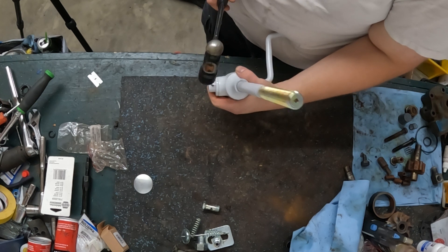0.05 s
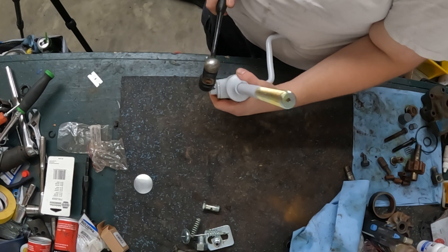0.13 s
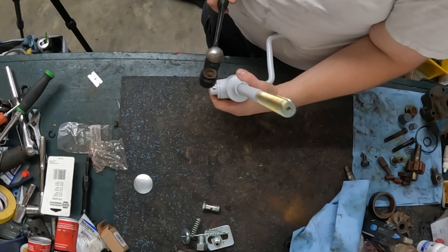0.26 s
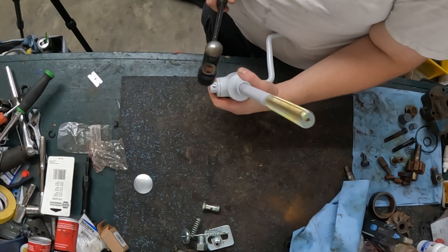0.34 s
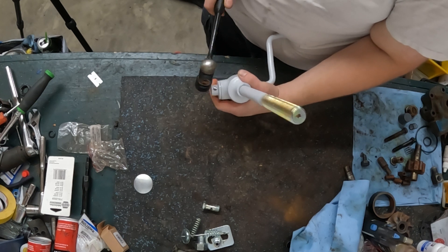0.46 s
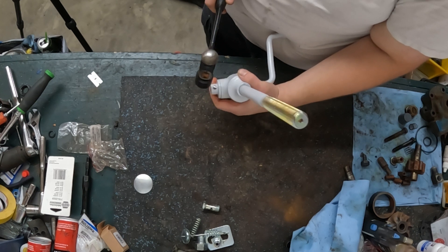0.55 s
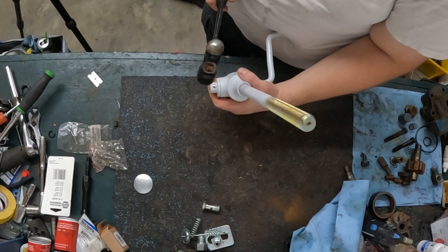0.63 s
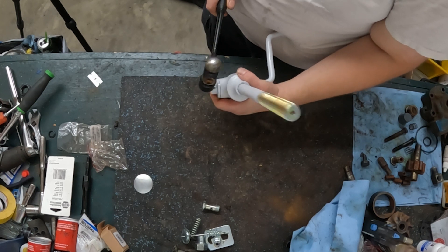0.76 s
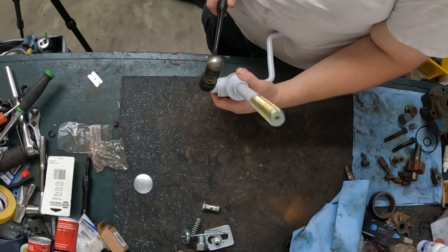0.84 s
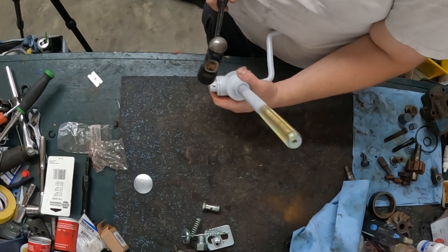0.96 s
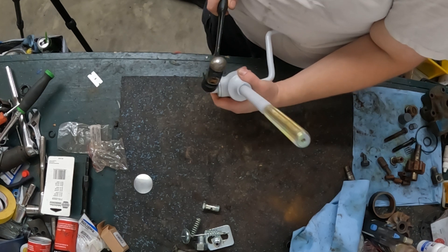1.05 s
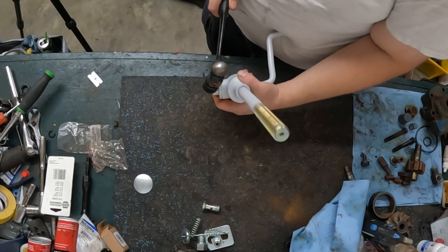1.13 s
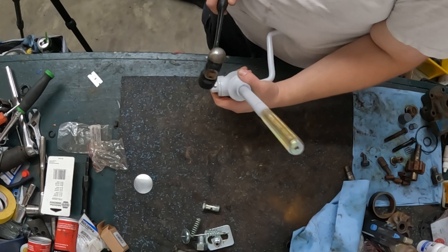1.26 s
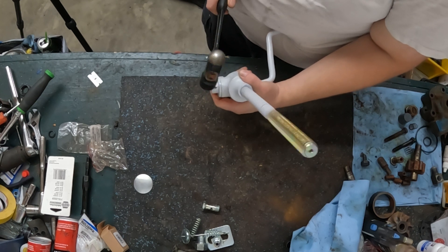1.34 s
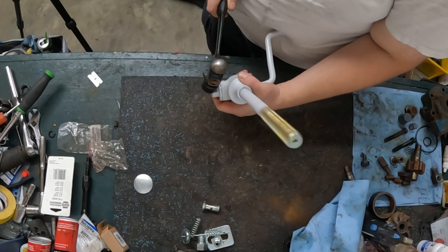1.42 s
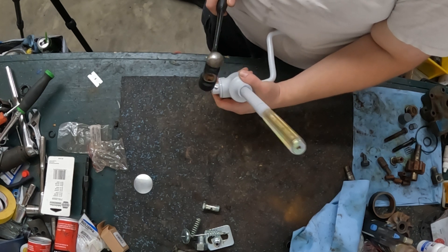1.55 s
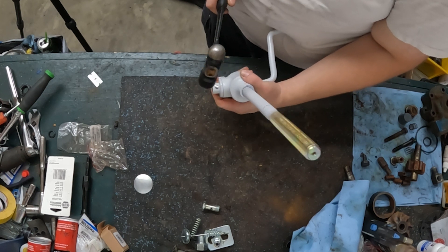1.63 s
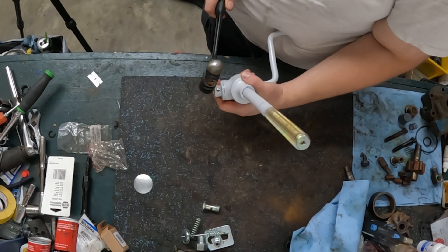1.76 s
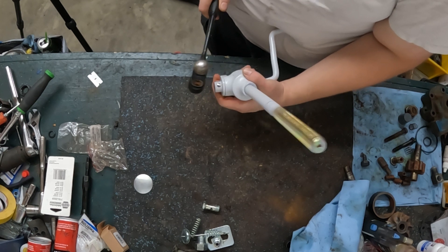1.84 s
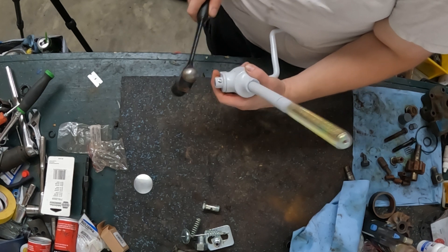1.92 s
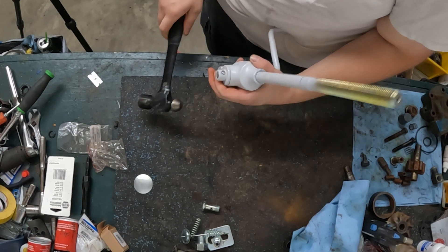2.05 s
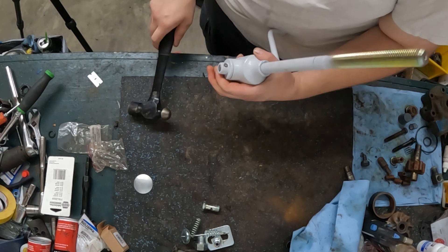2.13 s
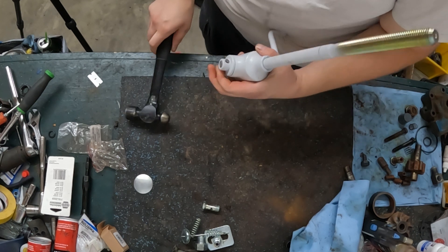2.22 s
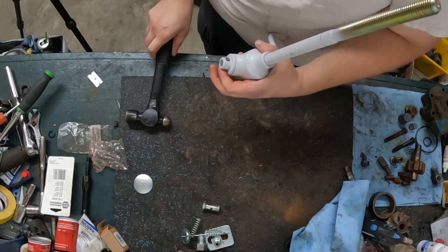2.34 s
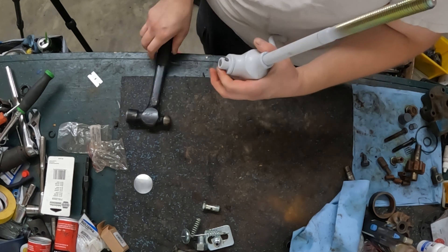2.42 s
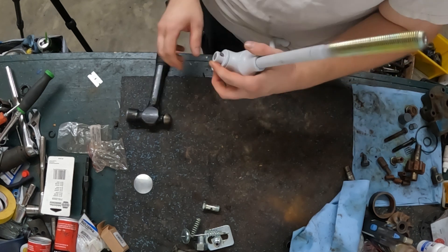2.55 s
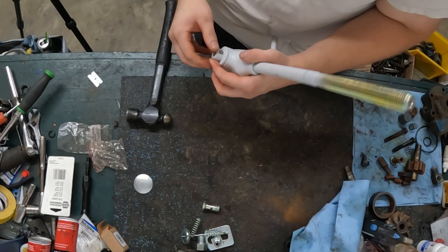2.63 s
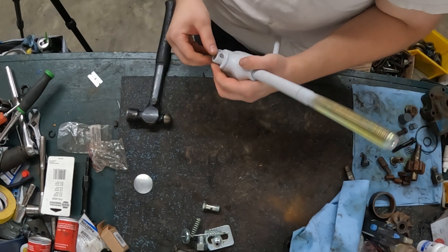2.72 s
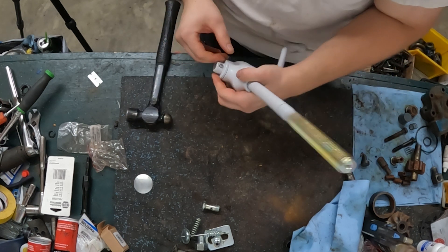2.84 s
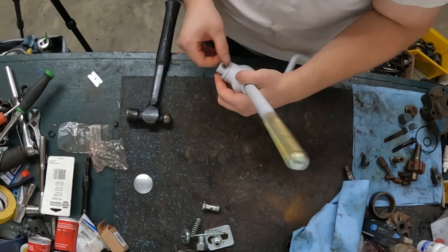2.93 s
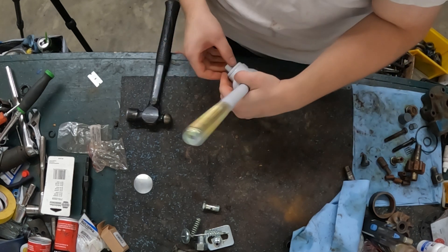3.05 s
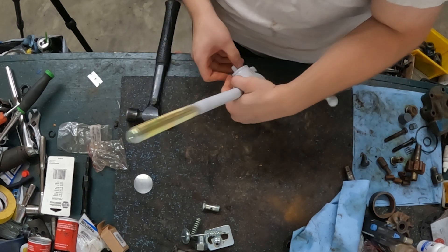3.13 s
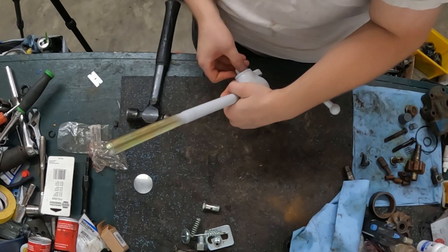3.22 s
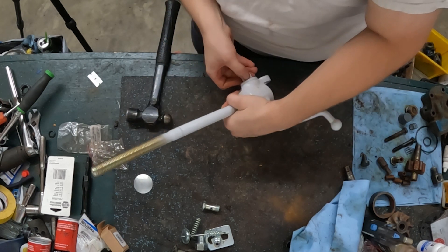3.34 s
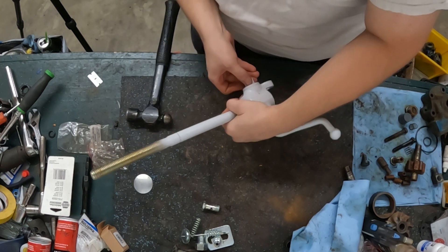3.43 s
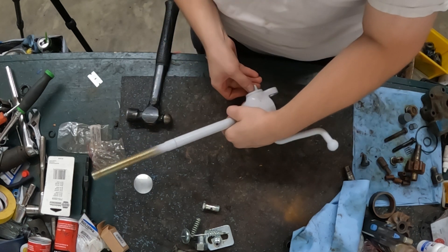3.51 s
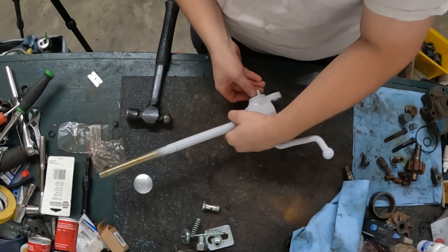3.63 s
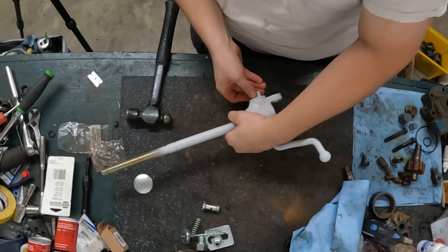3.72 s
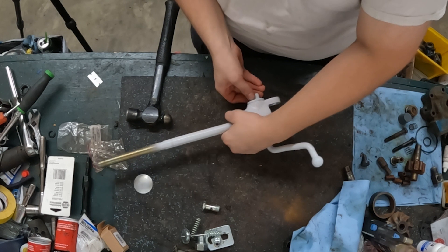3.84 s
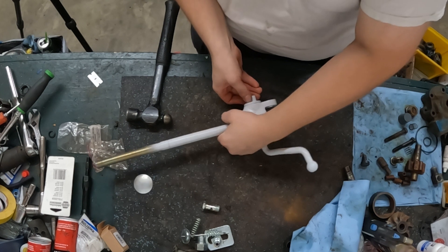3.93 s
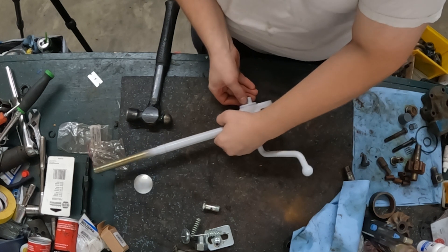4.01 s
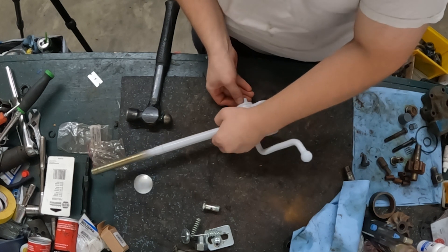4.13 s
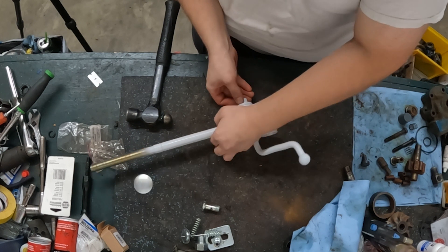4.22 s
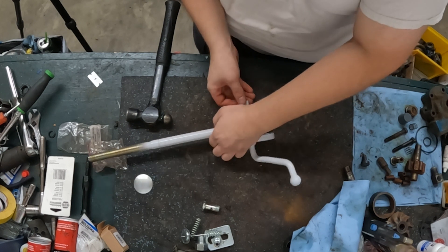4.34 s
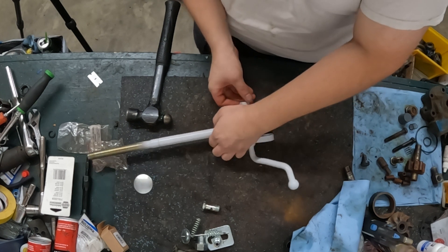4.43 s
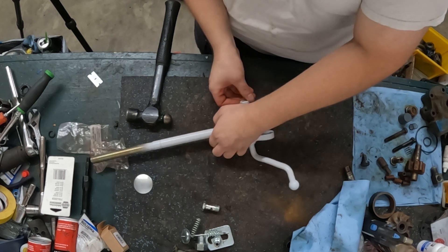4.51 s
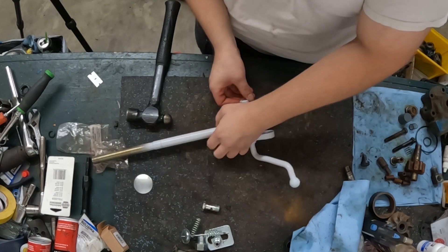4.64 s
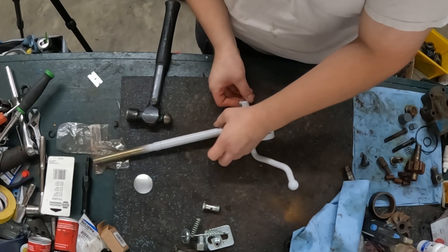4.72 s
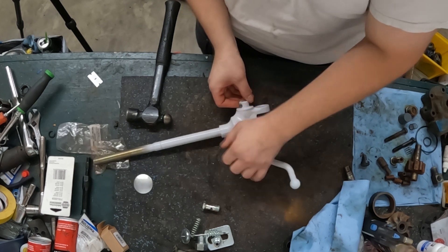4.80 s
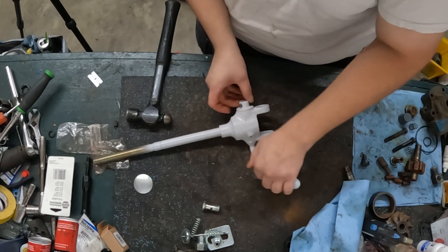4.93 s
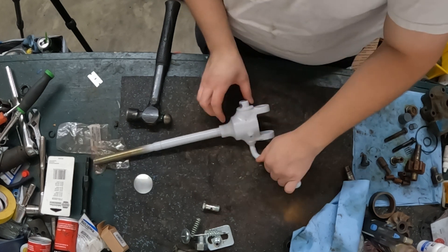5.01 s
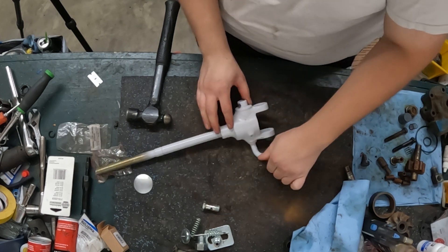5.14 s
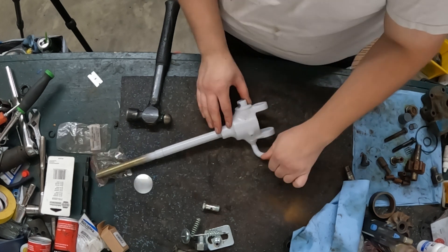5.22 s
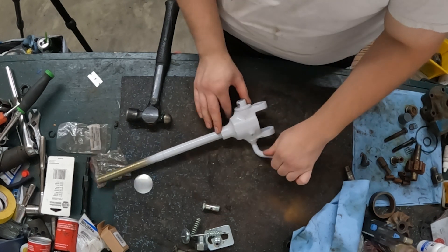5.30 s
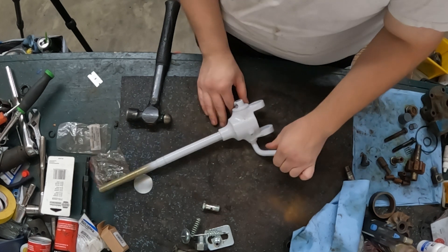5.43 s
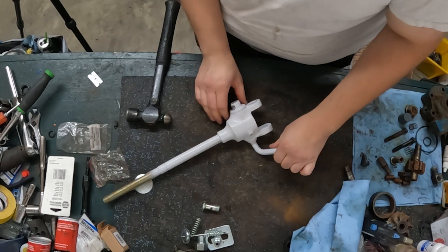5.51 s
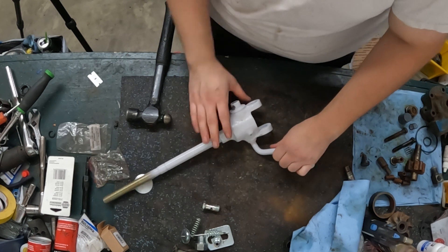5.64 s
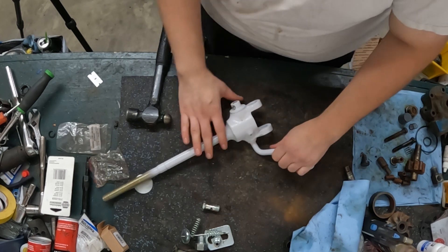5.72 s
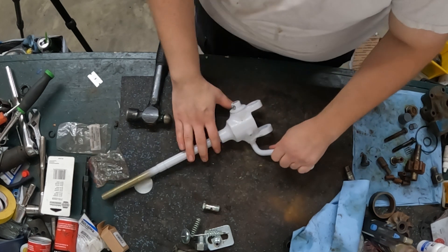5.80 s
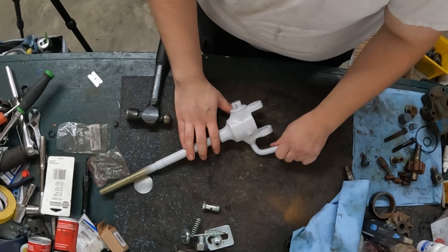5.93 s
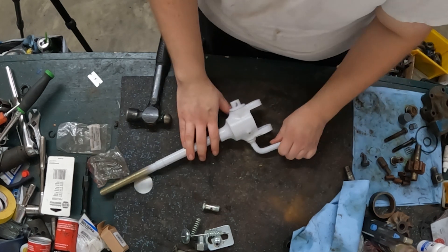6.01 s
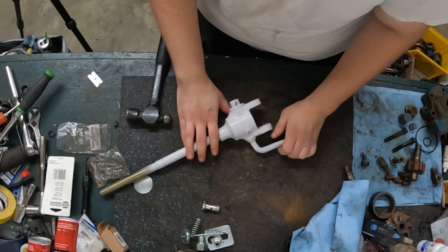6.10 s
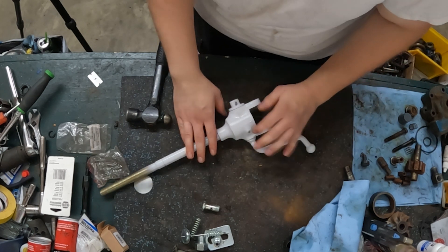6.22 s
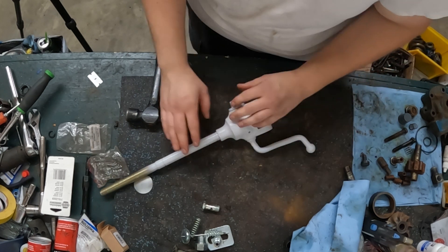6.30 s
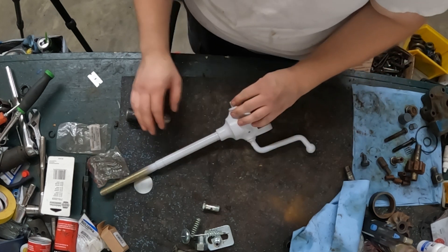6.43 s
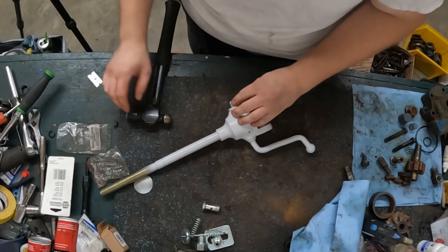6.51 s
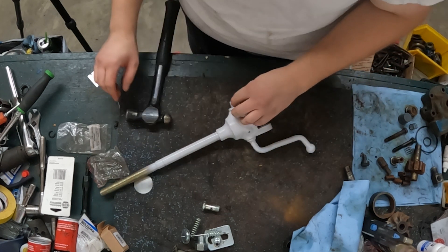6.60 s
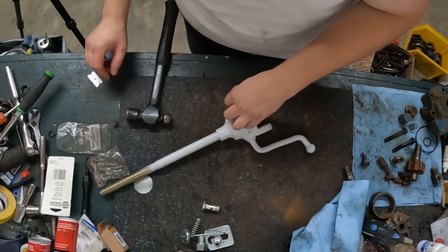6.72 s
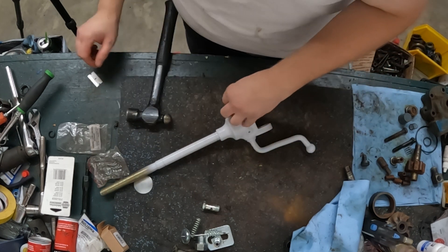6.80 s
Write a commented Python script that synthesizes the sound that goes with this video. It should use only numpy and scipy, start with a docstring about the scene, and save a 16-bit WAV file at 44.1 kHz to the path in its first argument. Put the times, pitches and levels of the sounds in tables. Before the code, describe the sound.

A hammer taps a pin into a steel shaft six times, then metal thuds, clicks and slides on a workbench.

```python
"""Six ringing hammer taps drive a pin into a hand-held steel shaft; the hammer is then laid on the bench.
The shaft is turned over, set down with thuds, slid, clicked and squeaked across the bench mat.
Hits are noise cracks and decaying steel or bench modes; slides are friction noise, squeaks stick-slip.
A hard surface returns each crack a few ms later; mains hum and a low rumble fill the workshop."""
import sys
import numpy as np
from scipy import signal
from scipy.fft import rfft, irfft
from scipy.io import wavfile
from scipy.ndimage import uniform_filter1d

SR = 44100
rng = np.random.default_rng(int(sys.argv[2]) if len(sys.argv) > 2 else 0)


def generate_wav(signal):
    """Clip the signal to [-1, 1] and save it as 16-bit WAV at the path in sys.argv[1]."""
    frames = np.transpose(np.atleast_2d(signal))
    scaled = np.clip(frames, -1, 1) * 32767
    pcm = np.round(scaled).astype(np.int16)
    wavfile.write(sys.argv[1], SR, pcm)


N = 302526
LEAD_S = .2  # tracks start this long before zero
BIN_HZ = np.fft.rfftfreq(2048, 1 / SR)


def gain_of(db):
    return 10 ** (np.asarray(db) / 20)


def unit_rms(x):
    return x / np.sqrt(np.mean(x ** 2) + 1e-20)


def curve_at(points, hz):
    point_hz, value = np.transpose(points)
    return np.interp(np.log(hz + 1), np.log(point_hz + 1), value)


def bell_db(hz, centre_hz, octave_drop_db):
    return -octave_drop_db * np.log2((hz + 1) / centre_hz) ** 2


def track(*channels):
    return np.zeros(channels + (N + round(LEAD_S * SR),))


def add(mix, s, sound):
    part = mix[..., round((s + LEAD_S) * SR):][..., :sound.shape[-1]]
    part += sound[..., :part.shape[-1]]


def narrow_band(noise, hz, width_hz):
    """Two resonators in series; unit rms."""
    r = np.exp(-np.pi * width_hz / SR)
    b, a = [1 - r, 0, r - 1], [1, -2 * r * np.cos(2 * np.pi * hz / SR), r * r]
    return unit_rms(signal.lfilter(b, a, signal.lfilter(b, a, noise)))


def hammer():
    """Each blow cracks and rings the hand-damped steel, detuned by the grip; the head pings."""
    # (time [s], level [dB], head ping [dB]); the first falls before zero
    blows = [(-.1, -13, -36), (0.2107, -12.5, -28), (0.5077, -13, -29), (0.8307, -11, -26),
             (1.164, -10.5, -28.5), (1.4857, -11, -27.5), (1.802, -11.5, -25)]
    # shaft and pin modes: (frequency [Hz], level [dB], t60 before hand damping [s])
    steel_modes = [(590, -3, .12), (1440, -4, .1), (2355, -8, .15), (3320, -8, .07), (3460, -9, .07),
                   (3635, -4, .13), (3850, -3, .06), (4550, -9, .08), (5120, -6, .11), (6220, -7, .07),
                   (11290, -7, .1), (12880, -12, .1)]
    # hammer head modes: (frequency [Hz], level [dB], t60 [s])
    head_modes = [(7400, 0, .13), (9995, 0, .14)]
    # crack spectrum: (frequency [Hz], density [dB])
    crack_colour = [(180, -37), (380, -29), (620, -24), (1450, -10.5), (2100, -14.5), (2890, -16.5),
                    (3770, -9), (4170, -9), (5020, -8), (7630, -7.5), (8730, -10.5), (11200, -9),
                    (15200, -21.5), (16500, -24.5)]
    echo_db, ring_db, clang_db, clang_width_hz, hand_damping = 10, -32, 8, 150, 1.6
    t = np.arange(round(.3 * SR)) / SR
    head = sum(gain_of(db - 60 * t / t60_s) * np.sin(2 * np.pi * hz * t) for hz, db, t60_s in head_modes)
    steel_hz, steel_db, t60_s = np.transpose(steel_modes)[:, :, None]
    colour = gain_of(curve_at(crack_colour, BIN_HZ) + bell_db(BIN_HZ, 3900, .09))
    ring_envelope = gain_of(ring_db + bell_db(steel_hz, 3900, .09) - 60 * hand_damping * t / t60_s)
    hits, ringing = [], track()
    for s, db, head_db in blows:
        mode_gain = gain_of(steel_db + rng.normal(0, 2.5, steel_db.shape))
        mode_hz = steel_hz * rng.normal(1, .008, steel_hz.shape)
        clang = (mode_gain / (1 + 2j * (BIN_HZ - mode_hz) / clang_width_hz)).sum(0)
        hits.append((s, db, echo_db, colour * (1 + gain_of(clang_db) * clang)))
        ring = (mode_gain * ring_envelope * np.sin(2 * np.pi * mode_hz * t)).sum(0)
        add(ringing, s, gain_of(db) * ring + gain_of(head_db) * head)
    direct, echo = cracks(hits, decay_ms=5.4, echo_rise_ms=2.26)
    return direct + ringing, echo


def cracks(hits, decay_ms, echo_rise_ms):
    """Contact noise bursts and their smeared, duller reflection: (mono direct, stereo echo)."""
    pad_s, echo_delay_s, echo_cutoff_hz = 128 / SR, .005, 7430
    ms = np.maximum(np.arange(2048) / SR - pad_s, 0) * 1000
    decay = np.exp(-ms / decay_ms) * (ms > 0)
    swell = ms * np.exp(-ms / echo_rise_ms)
    spread = .55 + BIN_HZ / 16000  # left and right differ more in the treble
    echo_filter = 1 / np.sqrt(1 + spread ** 2 / 2) / (1 + 1j * BIN_HZ / echo_cutoff_hz) ** 2
    direct, echo = track(), track(2)
    for s, db, echo_db, colour in hits:
        spectra = rfft(rng.standard_normal((4, 2048)) * [decay, swell, swell, swell])
        spectra /= np.sqrt(uniform_filter1d(abs(spectra) ** 2, size=30, axis=1))  # whiten
        spectra *= colour / np.sqrt(np.mean(abs(colour) ** 2)) * np.linalg.norm(decay) / 2
        burst, common, sides = spectra[0], spectra[1], spectra[2:]
        reflection = irfft((common + spread * sides) * echo_filter)
        add(direct, s - pad_s, gain_of(db) * irfft(burst))
        add(echo, s - pad_s + echo_delay_s, gain_of(db + echo_db) * reflection)
    return direct, echo


def bench_thuds():
    """Landings shake the bench top: its modes swell, low ones slowest, peak together and die."""
    # landings: (time [s], peak [dB], place [0 middle, 1 edge], hardness as tilt [dB/octave])
    landings = [(2.263, -28, 0.49, 1), (2.364, -16, 0.16, -3), (2.399, -7.5, 0.18, 2.5),
                (2.555, -3, 0.81, 9.5), (2.577, -7.5, 0.5, 8), (2.657, -6, 1, 9), (2.722, -13, 0.55, 3.5),
                (4.63, -12, 0.17, -1), (4.818, -5, 0.16, 1), (4.862, -18.5, 0.16, 6),
                (5.544, -27, 0.31, 12.5), (5.653, -3.5, 0.2, 10), (5.963, -28.5, 0.0049, -7),
                (6.036, -28, 0.2, 4), (6.232, -24, 0.36, 6)]
    # plate modes: (frequency [Hz], struck mid [dB], struck at edge [dB], t60 [s])
    plate_modes = [(43.2, -3.5, -15, 0.56), (58, 4.5, 19, 0.26), (96.8, -3.5, 4.5, 0.23),
                   (118.8, 21.5, -24.5, 0.21), (152, -6, -1.5, 0.28), (194.5, 11, -45, 0.14),
                   (215.8, -18, 8, 0.13), (309, -15, -5.5, 0.08), (412, -7, 8.5, 0.0082)]
    # contact to common peak: (middle [s], edge [s])
    peak_delays_s = (0.01286, 0.0157)
    out, t = track(), np.arange(round(.5 * SR)) / SR
    hz, middle_db, edge_db, t60_s = np.transpose(plate_modes)[:, :, None]
    rise_s = .0063 * np.sqrt(100 / hz)
    swell = 1 - np.exp(-(t / rise_s) ** 2)
    for s, db, place, tilt_db in landings:
        mode_db = (1 - place) * middle_db + place * edge_db + tilt_db * np.log2(hz / 120)
        peak_s = np.interp(place, [0, 1], peak_delays_s)
        thud = (gain_of(mode_db - 60 * t / t60_s) * swell * np.cos(2 * np.pi * hz * (t - peak_s))).sum(0)
        add(out, s, gain_of(db) * thud / abs(thud).max())
    return out


def metal_clicks():
    """Metal parts touch: very short, bright cracks."""
    # contacts: (time [s], level [dB], echo re level [dB], centre [Hz])
    contacts = [(0.47, -38, 0, 3230), (4.294, -38.5, 6, 4470), (4.771, -20, 6.5, 3280),
                (4.794, -21.5, 6, 3170), (4.808, -20.5, 9, 3170), (4.82, -19, 2, 4000),
                (4.84, -19, 9, 5500), (4.864, -29, 7, 4500), (5.204, -21, 4, 2840), (5.311, -27.5, 1, 2590),
                (5.332, -25.5, 3, 2600), (5.387, -17.5, 2.5, 2690), (5.467, -30, 5, 3900),
                (5.476, -19.5, 0, 2000), (5.528, -32.5, 2, 3000), (5.651, -6.5, 7, 2950),
                (5.687, -18, 5.5, 2680), (5.986, -31.5, 13, 3300), (6.231, -35, -2, 3830)]
    hits = [(s, db, echo_db, gain_of(bell_db(BIN_HZ, hz, 5))) for s, db, echo_db, hz in contacts]
    return cracks(hits, decay_ms=.96, echo_rise_ms=1.75)


def tool_clatter():
    """Tools land on the mat: longer, dull cracks."""
    # landings: (time [s], level [dB], echo re level [dB], centre [Hz])
    landings = [(2.393, -26, 1, 560), (2.556, -26, 13.5, 960), (2.657, -29, 8, 690), (2.603, -24, -4, 700),
                (6.036, -31.5, -6, 720)]
    hits = [(s, db, echo_db, gain_of(bell_db(BIN_HZ, hz, 4.5))) for s, db, echo_db, hz in landings]
    return cracks(hits, decay_ms=6.2, echo_rise_ms=6)


def steel_rings():
    """Struck steel rings briefly after a tap or click, in one or several wavering tones."""
    # (time [s], level [dB], frequency [Hz], t60 [s])
    ring_tones = [(.525, -40.5, 2474, 0.34), (2.562, -22.5, 3340, 0.044), (4.838, -22, 4050, 0.032),
                  (4.837, -28, 8050, .04), (4.84, -28, 7250, 0.066), (4.843, -30.5, 5160, 0.056),
                  (4.84, -42, 11350, 0.13), (4.84, -44, 15000, .1), (4.85, -38.5, 3625, 0.25),
                  (5.964, -45, 3740, 0.16), (5.984, -36.5, 2410, 0.079), (5.988, -51, 13890, 0.18),
                  (5.99, -36.5, 3680, 0.15)]
    out, t = track(), np.arange(round(.2 * SR)) / SR
    fade = np.minimum(t / .0014, 1) * np.minimum((t[-1] - t) / .05, 1)
    for s, db, hz, t60_s in ring_tones:
        waver = 1 + 5 * uniform_filter1d(rng.standard_normal(len(t)), 200)
        add(out, s, gain_of(db - 60 * t / t60_s) * waver * fade * np.sin(2 * np.pi * hz * t))
    return out


def slides():
    """Grit catches at random: grainy noise, coloured by the mat, swells and fades with each stroke."""
    # slides, hand and sleeve rustle: (peak [s], 20 dB rise [s], 20 dB fall [s], level [dB], treble [dB])
    strokes = [(2.42, 0.13, 0.29, -55, -9), (3.47, 0.2, 0.38, -59, -5), (4.15, 0.13, 0.25, -55.5, -23),
               (4.634, 0.044, 0.096, -43, -12), (4.758, 0.026, 0.053, -46.5, -17),
               (4.823, 0.055, 0.1, -37, -8), (5.18, 0.061, 0.13, -45.5, -9), (5.22, 0.093, 0.22, -44.5, 0),
               (5.33, 0.21, 0.18, -47.5, -15), (5.452, 0.035, 0.39, -51.5, -13),
               (5.534, 0.022, 0.023, -45.5, -10), (5.85, 0.085, 0.2, -53, -10),
               (5.985, 0.043, 0.11, -43.5, -13.5), (6.14, 0.2, 0.5, -55.5, -10),
               (6.24, 0.029, 0.02, -42.5, -20), (6.86, 0.17, .1, -53, -30)]
    # loose bits rattling after hard landings: (peak [s], level [dB], treble [dB])
    rattles = [(2.558, -35, -6.5), (2.666, -38.5, -18), (4.836, -41.5, -16), (5.651, -38, -13.5)]
    # mat friction spectrum: (frequency [Hz], density [dB])
    mat_colour = [(290, -3.5), (600, -5), (1090, -3.5), (1500, -5.5), (4000, -10), (7300, -17),
                  (8700, -22.5), (16000, -31.5)]
    size, split_hz, rattle_rise_s, rattle_fall_s = len(track()), 5500, .012, .14
    t, hz = np.arange(size) / SR - LEAD_S, np.fft.rfftfreq(size, 1 / SR)
    grain_db = 4.4 * np.minimum(rng.exponential(1, size), 5)
    grit = rfft(rng.standard_normal(size) * gain_of(grain_db)) * gain_of(curve_at(mat_colour, hz))
    low = unit_rms(irfft(grit / (1 + (hz / split_hz) ** 4), size))
    high = unit_rms(irfft(grit / (1 + (split_hz / (hz + 1)) ** 4), size))
    shakes = [(s, rattle_rise_s, rattle_fall_s, db, treble_db) for s, db, treble_db in rattles]
    power = np.zeros((2, size))
    for s, rise_s, fall_s, db, treble_db in strokes + shakes:
        drop_db = 20 * np.maximum((s - t) / rise_s, (t - s) / fall_s)
        near = drop_db < 40
        power[:, near] += gain_of([[db], [db + treble_db]] - drop_db[near]) ** 2
    return (np.sqrt(power) * [low, high]).sum(0)


def squeaks():
    """Rubbery stick-slip: a harmonic stack at a gliding, unsteady pitch."""
    # slips: (time [s], length [s], level [dB], start [Hz], end [Hz])
    slips = [(5.975, 0.039, -38.5, 1528, 1260), (6.086, 0.055, -39, 1408, 1530),
             (6.164, 0.037, -45.5, 1357, 1470), (6.191, 0.03, -45, 1440, 1490)]
    # harmonics 1-5: (level [dB])
    harmonics_db = [-2, -9, -11.5, -29, -20]
    out, rise_share = track(), .29
    for s, length_s, db, start_hz, end_hz in slips:
        progress = np.arange(0, length_s, 1 / SR) / length_s
        wobble = 1 + .31 * uniform_filter1d(rng.standard_normal(len(progress)), 60)
        phase = 2 * np.pi * np.cumsum((start_hz + (end_hz - start_hz) * progress) * wobble) / SR
        swell = np.sin(np.pi * np.interp(progress, [0, rise_share, 1], [0, .5, 1]))
        stack = sum(gain * swell ** (1.4 + 1.1 * k) * np.cos((k + 1) * phase)
                    for k, gain in enumerate(gain_of(harmonics_db)))
        add(out, s, np.sqrt(2) * gain_of(db) * stack)
    return out


def drags():
    """Heavy steel dragged over the mat: friction noise sings in narrow bands."""
    # pulls: (time [s], length [s], level [dB])
    pulls = [(2.258, 0.33, -61), (2.72, 0.13, -63), (4.96, 0.26, -62.5)]
    # steel resonances: (centre [Hz], width [Hz], level [dB])
    bands = [(4540, 460, 1.5), (8600, 310, -13)]
    out = track()
    for s, length_s, db in pulls:
        noise = rng.standard_normal(round(length_s * SR))
        song = sum(gain_of(band_db) * narrow_band(noise, hz, width_hz) for hz, width_hz, band_db in bands)
        add(out, s, gain_of(db) * song * signal.windows.tukey(len(noise), .55))
    return out


def rasp_and_drone():
    """Two swells of narrow noise: a high rasp as the shaft lands, and a low fuzzy drone."""
    # each: (time [s], length [s], level [dB], centre [Hz], width [Hz])
    rasp = (5.648, 0.02, -43, 14500, 700)
    drone = (3.5, 1, -61.5, 326, 70)
    out = track()
    for s, length_s, db, hz, width_hz in (rasp, drone):
        band = narrow_band(rng.standard_normal(round(length_s * SR)), hz, width_hz)
        add(out, s, gain_of(db) * band * signal.windows.tukey(len(band), .5))
    return out


def shop_reverb(x):
    """Stereo reflections: sparse taps of random sign, each band dying at its own rate."""
    # room decay: (frequency [Hz], t60 [s])
    decay_times = [(300, 0.39), (1000, 0.23), (3000, 0.33), (7000, 0.27), (14000, 0.29)]
    taps = np.zeros((2, SR // 2))
    slots = np.arange(400, SR // 2 - 16, 16)
    arrivals = slots + rng.integers(0, 16, (2, len(slots)))
    np.put_along_axis(taps, arrivals, rng.choice([-1., 1.], arrivals.shape), 1)
    hz, t, spectra = signal.stft(taps, SR, nperseg=256)
    coherence = np.clip(.85 - hz / 18000, 0, 1)[:, None]
    spectra[1] = coherence * spectra[0] + np.sqrt(1 - coherence ** 2) * spectra[1]
    spectra *= gain_of(-60 * t / curve_at(decay_times, hz)[:, None])
    tail = signal.istft(spectra, SR, nperseg=256)[1]
    return signal.fftconvolve(x[None], tail / np.linalg.norm(tail[0]), axes=1)[:, :len(x)]


def mains_hum():
    """Mains harmonics, each wavering slightly in level."""
    # tones: (frequency [Hz], rms level [dB])
    tones = [(119.5, -52), (360, -72.5), (479.5, -71)]
    hz, db = np.transpose(tones)[:, :, None]
    waver_db = .24 * unit_rms(uniform_filter1d(rng.standard_normal((len(tones), N)), 6000, 1))
    return np.sqrt(2) * (gain_of(db + waver_db) * np.sin(2 * np.pi * hz * np.arange(N) / SR)).sum(0)


def shop_air():
    """Faint, mildly patchy noise over a low rumble that eases off."""
    # background spectrum: (frequency [Hz], density [dB])
    air_colour = [(12, -63.5), (20, -3.5), (58, 7.5), (91, -17), (124, -11.5), (174, -17), (351, -22.5),
                  (440, -25), (479, -21.5), (583, -25.5), (860, -24.5), (994, -17), (1140, -22),
                  (1510, -26), (14700, -39), (16500, -43)]
    # left-right likeness: (frequency [Hz], coherence [0-1])
    likeness = [(60, 1), (180, 0.81), (400, 0.059), (1650, 0.069), (5000, 0.069), (15000, 0.1)]
    # rumble below 100 Hz: (time [s], relative level [dB])
    rumble = [(0.0, -46.5), (2.81, -51.5), (6.86, -51)]
    frames, rms_db = N // 512 + 5, -47.5
    draws = rng.standard_normal((frames, len(BIN_HZ), 5)).T
    left, independent = draws[:2] + 1j * draws[2:4]
    patches_db = 1.2 * unit_rms(uniform_filter1d(uniform_filter1d(draws[4], 20, 0), 10, 1))
    coherence = curve_at(likeness, BIN_HZ)[:, None]
    right = coherence * left + np.sqrt(1 - coherence ** 2) * independent
    spectra = np.array([left, right]) * gain_of(curve_at(air_colour, BIN_HZ)[:, None] + patches_db)
    rumble_db = np.interp(np.arange(frames) * 512 / SR, *np.transpose(rumble))
    spectra[:, BIN_HZ < 100] *= gain_of(rumble_db - rumble_db.mean())
    return gain_of(rms_db) * unit_rms(signal.istft(spectra, nperseg=2048, noverlap=1536)[1][:, :N])


def scene():
    """Stereo mix of direct sounds, echoes, reverb and background."""
    blows, blow_echo = hammer()
    clicks, click_echo = metal_clicks()
    clatter, clatter_echo = tool_clatter()
    handling = clicks + clatter + steel_rings() + slides() + squeaks() + drags() + rasp_and_drone()
    handling_echo = click_echo + clatter_echo
    thuds = bench_thuds()
    # blows in the open air fill the shop more than sounds down on the bench
    send = gain_of(-6.5) * (blows + blow_echo.mean(0)) + gain_of(-15) * (handling + handling_echo.mean(0))
    mix = (blows + handling) * gain_of([[.3], [-.3]]) + blow_echo + handling_echo + shop_reverb(send)
    mix += thuds * gain_of([[-.12], [.12]]) + gain_of(-19.5) * shop_reverb(thuds)
    return mix[:, -N:] + mains_hum() + shop_air()


def record(dry):
    """Low-pass at 16.1 kHz."""
    return signal.oaconvolve(dry, signal.firwin(511, 16100, window=("kaiser", 9), fs=SR)[None], "same")


dry = scene()
out = record(dry)
generate_wav(out)
```